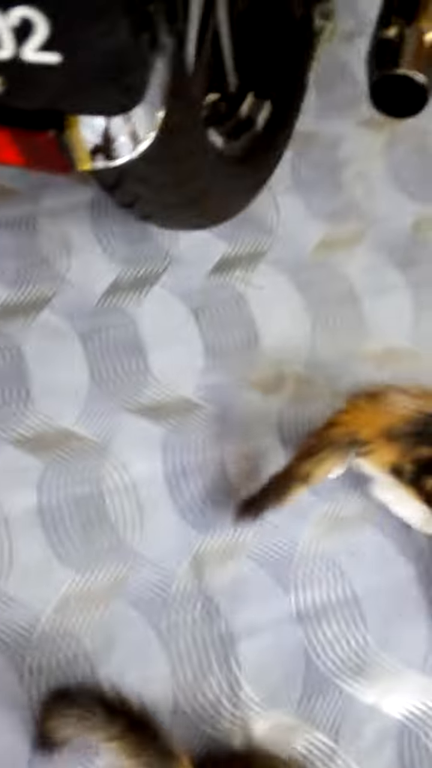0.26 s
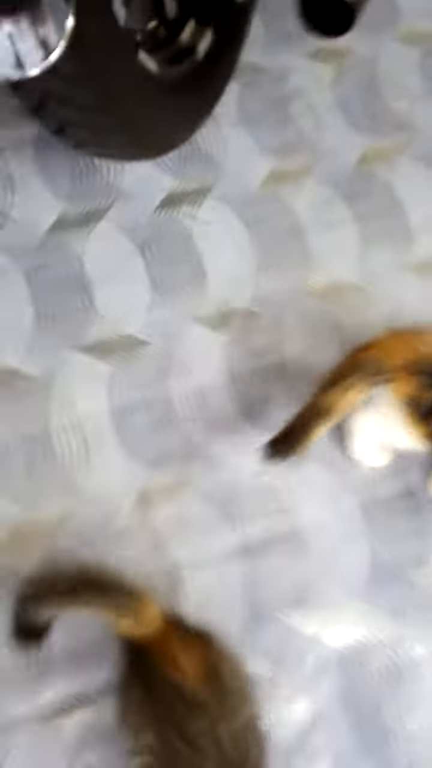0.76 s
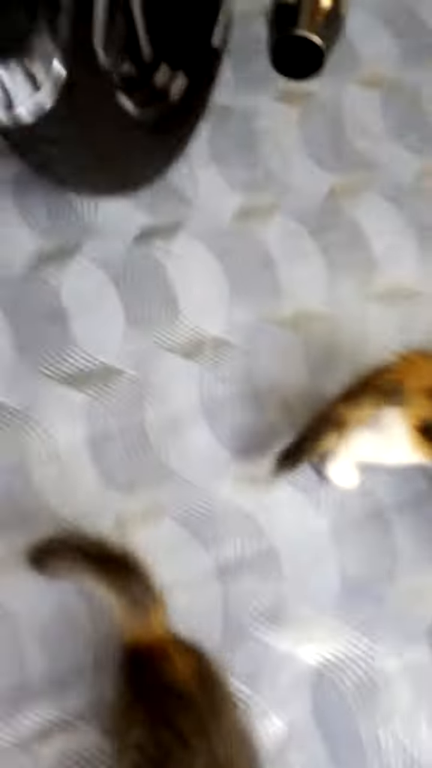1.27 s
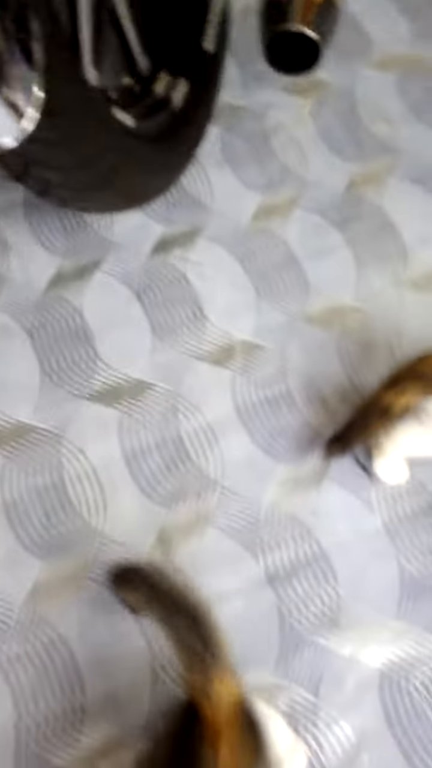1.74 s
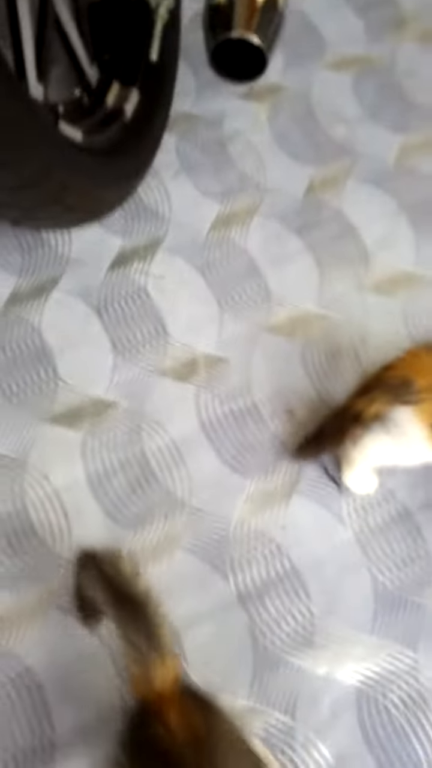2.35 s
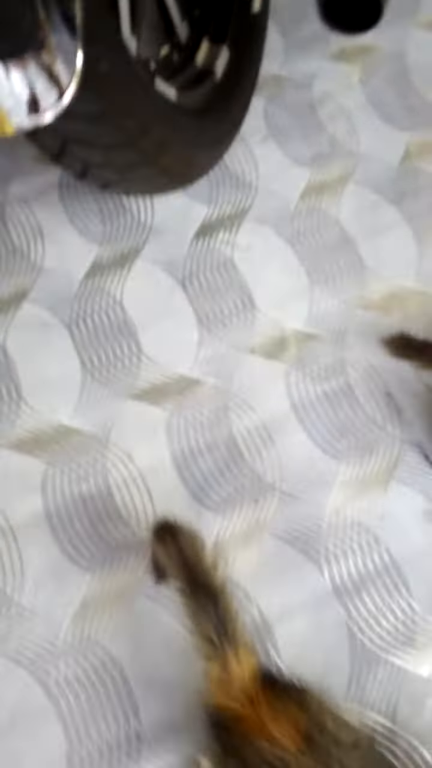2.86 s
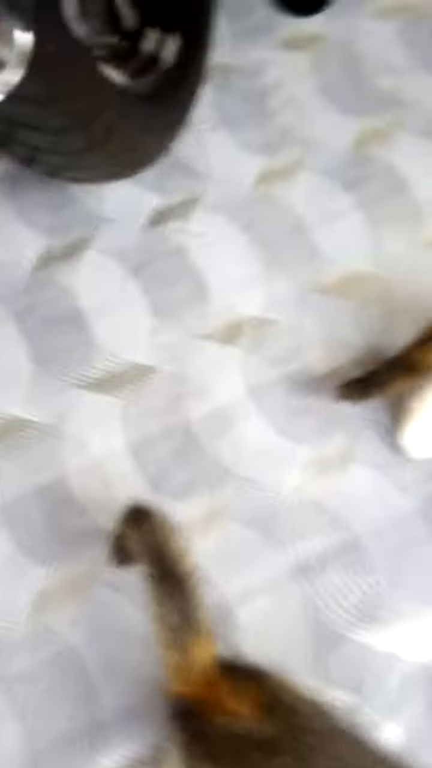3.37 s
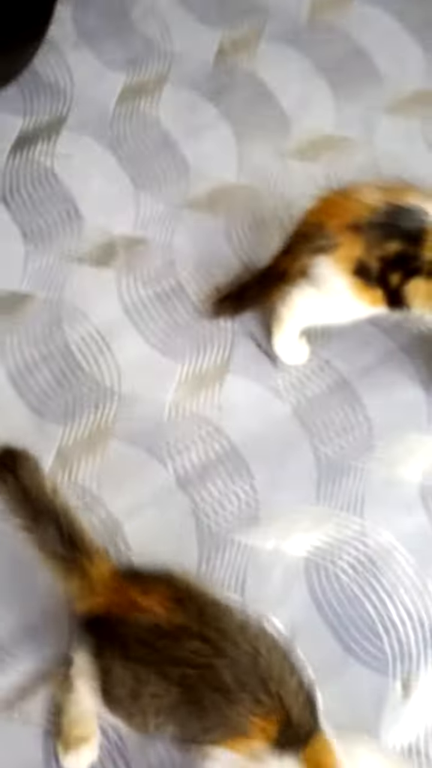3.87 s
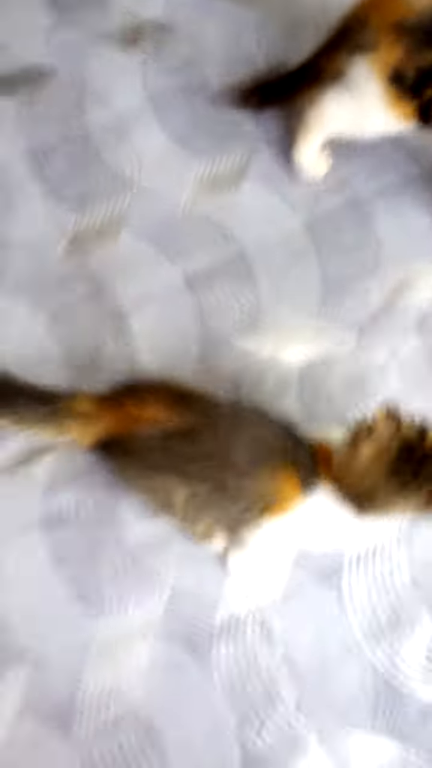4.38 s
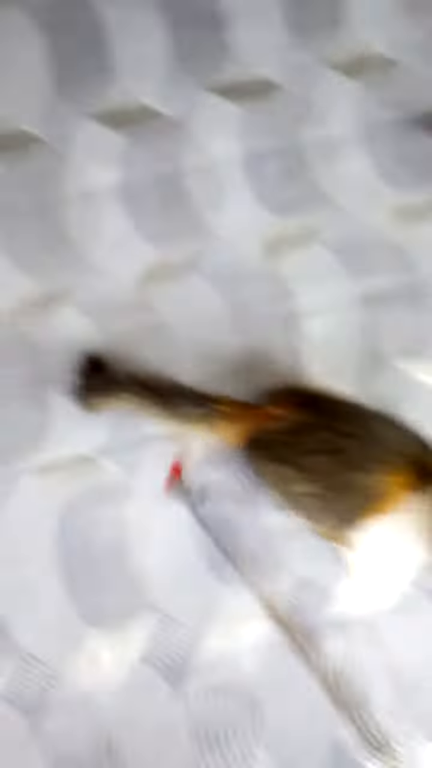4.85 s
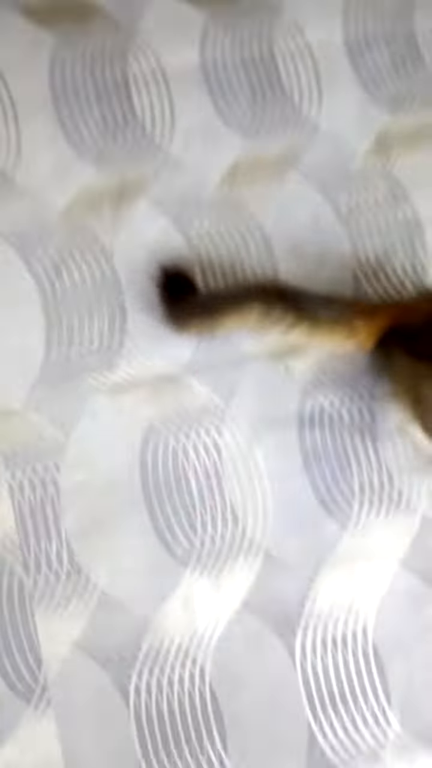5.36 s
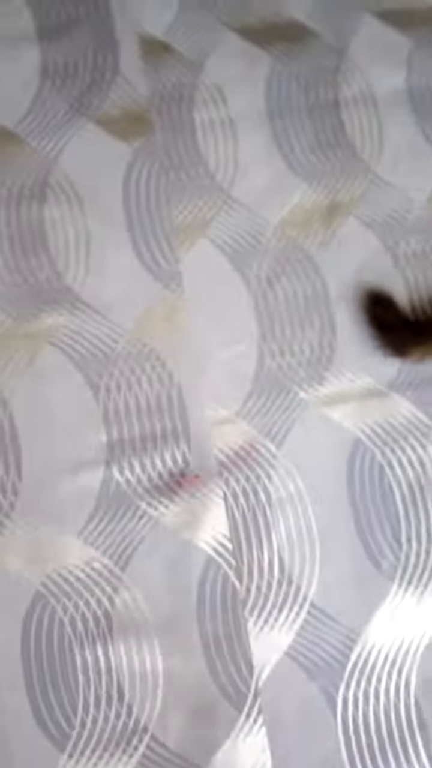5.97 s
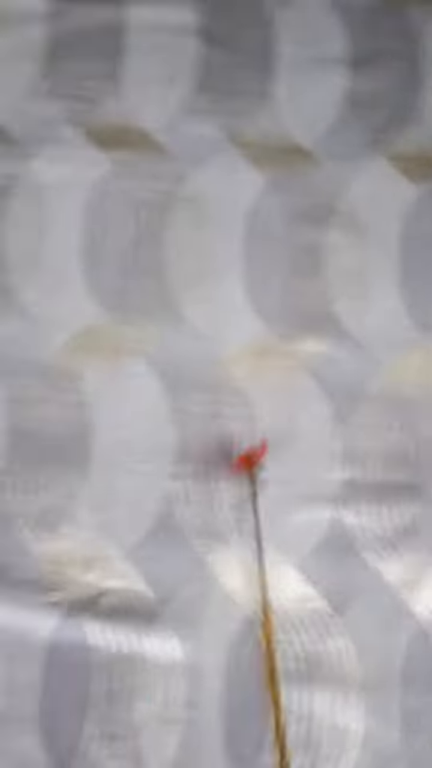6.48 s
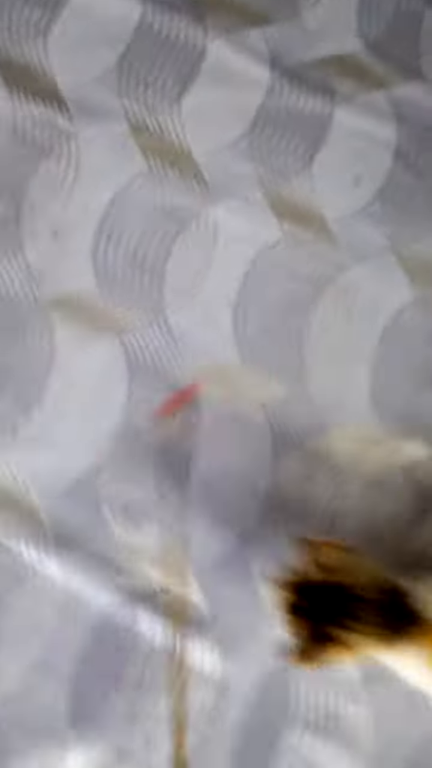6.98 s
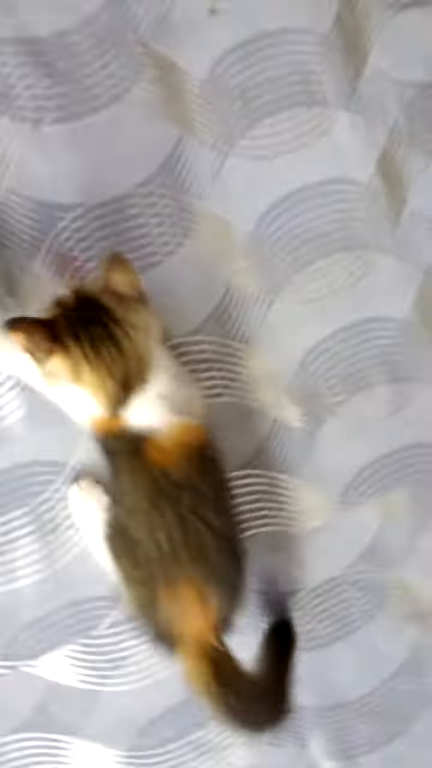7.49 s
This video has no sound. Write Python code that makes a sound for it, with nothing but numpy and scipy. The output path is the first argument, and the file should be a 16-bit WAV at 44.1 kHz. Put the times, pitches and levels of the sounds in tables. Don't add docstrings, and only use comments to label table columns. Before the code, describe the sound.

A close phone microphone in a small hard room picks up kittens on a thin plastic sheet, over low hiss and a very faint distant engine idle. From 0 to 1.8 s, dry bright crackles come in short uneven clusters, with hard single snaps near 1.2 and 1.5 s. Crinkling continues to about 2 s, then thins; a small hard toy knocks at 2.5 s with a weaker rebound. From 3.3 to 3.8 s wrestling makes dense crackling and sliding rustle, with a tiny metal bell jingling until about 4.2 s. A lull follows: faint claw ticks, a soft bump, and a more distant bell at 4.6 s. At 5.2 s crackling returns, loudest and sharpest from 5.4 to 6.5 s, with muffled paw thuds. After a gap, lower snaps and drumming sheet landings come at 7.1-7.6 s, then settle.

```python
import sys
import numpy as np
from scipy import signal
from scipy.fft import rfft, irfft
from scipy.io import wavfile
from scipy.ndimage import uniform_filter1d

SR = 44100
rng = np.random.default_rng(int(sys.argv[2]) if len(sys.argv) > 2 else 0)


def nominal_scale(level):
    x = np.asarray(level, float) / 20
    return 10 ** x


def output_pcm(signal):
    pcm = np.clip(np.atleast_2d(signal).T, -1, 1) * 32767
    wavfile.write(sys.argv[1], SR, np.round(pcm).astype(np.int16))


N = 340893

# t/s, duration/ms, level/dB,
# loudest f/Hz, spread/octaves
BUCKLING_CREASES = [(0.0012, 3.6, -50, 3850, 0.79), (0.0117, 4, -42.5, 3460, 0.99),
                    (0.2265, 2, -37.5, 4080, 0.37), (0.2272, 2.7, -32, 2890, 0.26),
                    (0.2731, 3.4, -37.5, 3540, 0.71), (0.2829, 5, -36, 3700, 0.54),
                    (0.2914, 4.3, -31.5, 2880, 0.57), (0.3148, 6.4, -28.5, 4700, 0.72),
                    (0.3219, 3.4, -32, 4900, 0.37), (0.3274, 8.2, -27, 4580, 0.32),
                    (0.3371, 2.9, -26, 4470, 0.39), (0.3449, 3.8, -27, 4340, 0.37),
                    (0.3993, 2.3, -47, 3680, 0.4), (0.4356, 7.0, -48, 3700, 0.28),
                    (0.4489, 7.9, -50.5, 3530, 0.32), (0.599, 1.4, -31.5, 3400, 0.64),
                    (0.6038, 5, -30.5, 2340, 0.17), (0.6091, 3.8, -29, 3260, 0.47),
                    (0.9522, 2.1, -48.5, 3530, 0.12), (0.9596, 1.2, -43, 3650, 0.16),
                    (1.181, 6, -63, 4040, 0.5), (1.1973, 1.07, -17.5, 4820, 0.3),
                    (1.3362, 3.9, -48, 2480, 0.073), (1.4636, 1.3, -18, 3850, 0.27),
                    (1.4917, 6.5, -35.5, 3470, 0.76), (1.5018, 10.5, -33.5, 2480, 0.4),
                    (1.5107, 3.7, -35.5, 2500, 0.29), (1.5284, 4.7, -25.5, 3780, 0.39),
                    (1.5412, 4.7, -27, 4900, 0.53), (1.5581, 1.2, -27, 3070, 0.27),
                    (1.6038, 2.7, -37.5, 3140, 0.19), (1.6234, 4.1, -38, 3530, 0.36),
                    (1.6388, 4.1, -28, 3130, 0.38), (1.6527, 3.5, -31.5, 4140, 0.61),
                    (1.7246, 2, -39, 3500, 0.42), (1.7801, 4.6, -55, 5000, 0.24),
                    (1.808, 1.3, -39.5, 3550, 0.075), (1.8137, 4.6, -39.5, 3520, 0.13),
                   (1.832, 5.7, -34, 5100, 0.29), (1.8452, 1.6, -28, 3600, 0.29),
                   (1.863, 1.6, -27, 3360, 0.46), (1.881, 1.7, -34.5, 3570, 0.35),
                   (1.9107, 1.4, -38, 3260, 0.36), (1.9161, 5.8, -46, 3470, 0.33),
                   (1.924, 2.6, -37, 3600, 0.17), (1.928, 6.3, -38, 3300, 0.3),
                   (1.938, 7.4, -36, 3730, 0.29), (1.949, 7.6, -37.5, 3370, 0.28),
                   (1.9618, 11.4, -33.5, 3530, 0.42), (1.9733, 6.5, -32, 3870, 0.63),
                   (2.4572, 3.7, -30, 2940, 0.06), (2.572, 11.2, -51.5, 2860, 0.1),
                   (3.2595, 7.6, -42.5, 1770, 0.31), (3.3053, 2.9, -29, 4930, 0.43),
                   (3.318, 5.7, -36, 5070, 0.71), (3.322, 3.1, -43, 3680, 0.68),
                   (3.3276, 3.7, -33.5, 5500, 0.22), (3.335, 2.1, -35.5, 4070, 0.7),
                   (3.378, 18, -47, 2310, 0.31), (3.3975, 3.2, -29, 2360, 0.32),
                   (3.412, 3.8, -28, 2470, 0.31), (3.4252, 11.6, -28, 4180, 0.67),
                   (3.4454, 2.2, -36, 3930, 0.48), (3.4551, 5.4, -30.5, 3470, 0.44),
                   (3.4996, 6.4, -48, 3500, 0.48), (3.5144, 3.5, -47, 5000, 0.47),
                   (3.522, 1.3, -35, 5100, 0.27), (3.529, 4.1, -39, 5000, 0.42),
                   (3.531, 16, -44.5, 2940, 0.24), (3.5508, 8, -37, 3620, 0.48),
                   (3.564, 2.1, -35, 2700, 0.21), (3.5686, 8, -31.5, 2765, 0.21),
                    (3.583, 12, -36.5, 3570, 0.46), (3.5969, 3.7, -28, 3200, 0.23), (3.602, 4, -29, 3670, 0.29),
                (3.6069, 4.7, -32.5, 3650, 0.47), (3.6163, 2.9, -30, 3140, 0.23),
                (3.6186, 9.1, -30, 3520, 0.29), (3.6298, 4.3, -30, 3340, 0.34),
                (3.6389, 1.3, -31, 3260, 0.23), (3.6615, 3.3, -30, 4700, 0.32),
                (3.6706, 3.6, -27.5, 5020, 0.32), (3.684, 7.2, -41.5, 3450, 0.59),
                (3.6957, 2.9, -34, 3550, 0.49), (3.7013, 3.3, -27, 3730, 0.26),
                (3.7104, 5.2, -34, 3700, 0.56), (3.7164, 7.1, -35, 3550, 0.75),
                (3.7271, 2.9, -28, 3560, 0.71), (3.734, 2.1, -22, 5040, 0.27), (3.747, 14, -32, 4900, 0.8),
                (3.767, 7.4, -32, 2490, 0.28), (3.778, 1.3, -30, 2420, 0.17),
                (3.7851, 3.4, -29, 2480, 0.39), (3.838, 3.4, -50, 4360, 0.57), (3.848, 16, -60, 4670, 0.61),
                (3.866, 4.3, -48, 5550, 0.4), (3.8717, 7.2, -45.5, 5640, 0.34),
                (3.8877, 4.3, -54, 5480, 0.3), (3.9, 3.4, -62, 5480, 0.23), (3.908, 3.5, -60, 5400, 0.23),
                (3.917, 5.1, -67, 5480, 0.24), (3.9544, 3.3, -58, 5560, 0.19),
                (3.962, 3.2, -53, 3450, 0.06), (5.2226, 1.4, -26, 2480, 0.3),
                (5.229, 3.7, -26.5, 4900, 0.6), (5.233, 2.6, -25, 5330, 0.25),
                (5.4078, 0.77, -20, 5000, 0.66), (5.4104, 3.5, -25.5, 3540, 0.86),
                    (5.4209, 3.8, -25, 2420, 0.35), (5.4467, 3.4, -26, 2970, 0.62),
                 (5.451, 4.7, -24, 5100, 0.73), (5.502, 11, -40.5, 2510, 0.69),
                 (5.527, 3.1, -23.5, 2550, 0.54), (5.589, 0.92, -17, 4080, 0.71),
                 (5.607, 5.1, -27, 3800, 0.31), (5.614, 5.2, -26, 4070, 0.57),
                 (5.6247, 5.7, -29, 2700, 0.64), (5.6615, 2.9, -34.5, 2320, 0.38),
                 (5.72, 8.9, -46.5, 2470, 0.54), (5.7321, 12, -51, 2950, 0.94),
                 (5.779, 3.6, -30.5, 2600, 0.29), (5.7818, 9, -30, 3000, 0.62),
                 (5.7933, 3.9, -22.5, 2356, 0.23), (5.8393, 3.7, -45, 2950, 0.77),
                 (5.8417, 6.3, -37.5, 2460, 0.9), (5.8496, 1.1, -31, 2220, 0.14),
                 (5.9548, 1.12, -15.5, 4000, 0.88), (5.9604, 11, -32.5, 2180, 0.65),
                 (6.0442, 1.07, -27, 2850, 1.1), (6.0475, 16.7, -31.5, 1770, 0.43),
                 (6.106, 7.7, -47, 3150, 0.99), (6.1257, 1.7, -29.5, 2180, 0.52),
                 (6.1482, 1.14, -23, 2050, 0.24), (6.1512, 4.6, -26.5, 2700, 0.18),
                 (6.1574, 5, -25.5, 3630, 0.34), (6.1717, 12, -52, 3700, 0.42),
                 (6.2734, 2.3, -48, 5100, 0.41), (6.282, 1.8, -52, 5100, 0.39),
                 (6.3053, 2.56, -25.5, 3270, 0.79), (6.3102, 3.1, -29.5, 2650, 0.5),
                 (6.3357, 2.2, -33, 4500, 0.56), (6.338, 10, -31.5, 3150, 0.65),
                 (6.357, 5.1, -33.5, 2860, 0.8), (6.3786, 11, -39, 2230, 0.38),
                    (6.392, 2.1, -44, 3700, 0.47), (6.3973, 2.1, -36, 3160, 1.1),
                  (6.4446, 2.3, -50.2, 4260, 0.52), (6.4503, 3.5, -56, 3900, 0.66),
                  (6.4633, 1.5, -24.5, 2640, 0.63), (6.4771, 0.58, -20, 2860, 0.5),
                  (6.4878, 2, -28, 3230, 0.92), (6.491, 4.8, -32, 3360, 0.71),
                  (6.5006, 3, -31.5, 3250, 0.84), (6.5203, 4.2, -25.5, 2830, 1),
                  (6.5602, 2.4, -43, 2610, 0.44), (6.567, 8.5, -35, 2320, 0.98),
                  (6.717, 7.3, -55.5, 1585, 0.24), (7.0718, 1.7, -49.5, 2710, 0.18),
                  (7.0821, 1.5, -23.5, 2240, 0.46), (7.109, 2, -32, 2660, 0.76),
                  (7.1218, 2, -39, 2850, 0.69), (7.1287, 4.1, -40, 2660, 0.83),
                  (7.1404, 2.76, -26, 1680, 0.37), (7.1507, 4.9, -23, 1785, 0.26),
                  (7.2427, 7.6, -53.5, 1770, 0.23), (7.2582, 3.2, -63, 6440, 0.15),
                  (7.3, 1.34, -33, 1720, 0.37), (7.3136, 2, -26.5, 1850, 0.36),
                  (7.3366, 3.3, -36, 1650, 0.069), (7.3519, 6.3, -38, 1690, 0.26),
                  (7.3577, 4.5, -38, 1800, 0.56), (7.4183, 5.9, -59, 2690, 0.59),
                  (7.4346, 5.8, -35, 2530, 0.16), (7.451, 2.8, -35, 3300, 1), (7.516, 1.5, -39, 2250, 0.58),
                  (7.523, 10.3, -27.5, 1736, 0.28), (7.614, 1.2, -45, 2520, 0.52),
                  (7.6265, 1.9, -42.5, 3500, 0.88), (7.644, 8.1, -34, 2320, 0.33),
                  (7.6982, 5, -46.5, 3800, 0.94)]
SECOND_CREASES = [(0.6011, 7.1, -36.5, 5480, 0.28), (1.2, 1.3, -24.5, 3600, 0.18),
                  (1.2007, 3.2, -29.5, 5100, 0.31), (1.8636, 2.9, -32, 2080, 0.16),
                  (2.4571, 3.7, -32.5, 5020, 0.055), (3.325, 9.2, -42.5, 2340, 0.18),
                  (3.425, 17, -32.5, 5300, 0.26), (3.962, 3.8, -40.5, 2620, 0.065),
                  (3.962, 3.3, -40, 4750, 0.08), (4.317, 1.9, -64, 2380, 0.17),
                  (4.369, 1.8, -67, 2350, 0.16), (5.484, 7, -44.5, 4900, 0.46),
                  (5.5274, 1.8, -29, 5800, 0.48), (5.53, 2.4, -32, 1820, 0.22),
                  (5.9684, 3.2, -33, 4570, 0.69), (6.142, 3.7, -33.5, 2000, 0.33),
                  (6.1584, 4, -27, 5800, 0.36), (6.521, 4, -31.5, 1730, 0.11),
                  (6.392, 8.1, -37.5, 5320, 0.15), (4.399, 3.2, -64, 2470, 0.15),
                  (6.781, 1.5, -58, 2300, 0.36), (7.434, 5.8, -37.5, 4700, 0.16)]
# t/s, duration/ms, level/dB
CLAW_TICKS = [(0.9083, 1.5, -55), (2.439, 1.2, -48.5), (4.106, 2.2, -53), (4.131, 0.5, -47),
              (4.262, 1, -59), (4.276, 1.1, -56), (4.294, 1.7, -47.5), (4.3519, 1.4, -59),
              (4.38, 1.9, -55.5), (4.422, 6.6, -52), (4.433, 5.8, -52), (4.45, 0.58, -48),
              (4.4666, 0.77, -38.5), (4.516, 1.1, -51.5), (4.599, 3.9, -58.5), (4.6272, 2.2, -56),
              (4.664, 1.1, -50), (4.821, 0.46, -46.5), (4.884, 3.6, -59.5), (6.821, 6.5, -56)]
# t/s of the peak, rise/s, fall/s, level/dB, brightness f/Hz
SLIDES = [
    (0, 0.011, 0.074, -40, 4480),
    (0.992, 0.037, 0.34, -64.5, 4350),
    (3.5, 0.18, 0.32, -46, 4400),
    (3.649, 0.067, 0.21, -48, 4580),
    (4.928, 0.08, 0.41, -69, 5030),
    (5.771, 0.032, 0.14, -40, 3520),
    (6.142, 0.026, 0.2, -51.5, 3600),
    (7, 0.054, 0.018, -61.5, 4000),
    (7.131, 0.045, 0.066, -41.5, 4200),
    (7.502, 0.088, 0.41, -57, 5430),
]
# f/Hz, level/dB
MIC_RESPONSE = [(700, -11.5), (1100, -6), (1500, -2), (5500, 2.5), (6500, -4), (7500, -23), (9000, -37.5),
                (13500, -47), (15200, -46), (16000, -72.5)]
# f/Hz, T60/s
ROOM_DECAY = [(1000, 0.35), (2500, 0.2), (5000, 0.25), (7000, 0.22), (12000, 0.19)]
# multiple of the idle rate, level/dB
ENGINE_ORDERS = [(4, -77), (5, -76), (6, -77), (7, -70), (8, -72.5), (9, -78.5), (10, -75), (20, -83.5)]
# f/Hz, level/dB per Hz
HISS_SPECTRUM = [(20, -16.5), (44, -22.5), (54, -7.5), (103, -1), (138, -14.5), (160, -10.5), (285, -14.5),
                 (610, -20.5), (1020, -21.5), (1840, -29), (5300, -34), (6500, -37), (8200, -49),
                 (13600, -48.5), (15300, -38.5), (15900, -67)]
# t/s, peak level/dB
CRACK_TIMES = [(1.1987, -47.5), (3.424, -53.5), (3.6531, -61), (3.8612, -50), (5.406, -38.5),
               (5.4525, -45.5), (5.589, -56), (5.953, -45.5), (6.52, -64), (7.313, -58), (7.624, -57)]
# t/s, peak level/dB
TOY_KNOCKS = [
    (2.457, -43),
    (2.568, -51.5),
]
# f/Hz, blur/Hz, level/dB, T60/s
TOY_MODES = [(2860, 147, 0.5, 0.2), (3620, 50, -10, 0.3), (4410, 57, -5.5, 0.15), (6310, 80, -7.5, 0.1),
             (2330, 390, 4.5, 0.12), (5000, 270, 4.5, 0.077)]
# t/s, f/Hz, level/dB, duration/s
PAW_THUDS = [
    (2.644, 57.8, -45, 0.13),
    (4.296, 100.7, -43, 0.094),
    (5.742, 66, -43.5, 0.22),
    (5.915, 55.5, -45, 0.15),
    (6.043, 601, -44.5, 0.067),
    (6.978, 89.5, -44.5, 0.17),
    (7.286, 808, -51, 0.075),
    (7.638, 257, -49, 0.22),
    (4.614, 2014, -56.5, 0.22),
]
# t/s, peak level/dB
BELL_STROKES = [(3.3789, -54.5), (3.4241, -57.5), (3.4391, -63), (3.4622, -57), (3.488, -62),
                (3.5137, -58.5), (3.6063, -52), (3.649, -50), (3.71, -53), (3.787, -52), (3.8389, -54),
                (3.8864, -54.5), (3.95, -57.5), (3.9664, -55.5), (3.985, -55.5), (4.008, -63), (4.04, -66),
                (4.111, -79.5), (4.188, -68), (4.215, -70.5)]
# f/Hz, blur/Hz, level/dB, T60/s
BELL_MODES = [(8250, 120, -5, 0.29), (5500, 360, 9, 0.36), (8700, 1200, -13.5, 0.2), (6320, 390, 2.5, 0.24),
              (4700, 630, 1.5, 0.098)]
# t/s, peak level/dB
SHAKE_STROKE = [(3.655, -71.5)]
# f/Hz, blur/Hz, level/dB, T60/s
SHAKE_MODE = [(15000, 800, 0.94, 0.3)]
# t/s, peak level/dB
FAR_STROKES = [
    (4.6, -66.5),
    (4.66, -56.5),
]
# f/Hz, blur/Hz, level/dB, T60/s
FAR_MODES = [(5160, 940, -2, 1), (5360, 110, -1.5, 0.5), (5020, 110, -3.5, 0.45)]
# t/s, peak level/dB
SHEET_LANDINGS = [
    (7.152, -48),
    (7.314, -39),
    (7.358, -52),
    (7.526, -37),
]
# f/Hz, blur/Hz, level/dB, T60/s
SLACK_MODE = [(1770, 600, -8, 0.21)]


def evened(x):
    return x / np.sqrt(np.mean(x ** 2) + 1e-20)


def read(points, hz):
    f, value = np.transpose(points)
    return np.interp(np.log(hz + 1), np.log(f + 1), value)


def add(mix, s, sound):
    part = mix[max(round(s * SR), 0):][:len(sound)]
    part += sound[:len(part)]


def causal(db):
    cepstrum = irfft(np.log(nominal_scale(db)))
    half = cepstrum.shape[-1] // 2
    cepstrum[..., 1:half] *= 2
    cepstrum[..., half + 1:] = 0
    return np.exp(rfft(cepstrum))


def drift(per_s):
    knot_rate = 200
    knots = rng.standard_normal(int(N / SR * knot_rate) + 2)
    span = int(knot_rate / per_s)
    smooth = evened(uniform_filter1d(uniform_filter1d(knots, span), span))
    return np.interp(np.arange(N) * knot_rate / SR, np.arange(len(knots)), smooth)


def blurred(hz, blur_hz, count):
    pole = np.exp(-np.pi * blur_hz / SR)
    noise = rng.standard_normal((2, count + 2000))
    wander = signal.lfilter([1], np.poly([pole, pole]), noise)[:, 2000:]
    turn = 2 * np.pi * hz * np.arange(count) / SR
    return evened(wander[0] * np.cos(turn) + wander[1] * np.sin(turn))


def creases():
    ticks = [(*tick, 4900, 0.21) for tick in CLAW_TICKS]
    return np.vstack([BUCKLING_CREASES,
                      ticks, SECOND_CREASES])


def crease_clicks(ms, t, luck, sizes, air):
    snap = (t == 0) & (ms < 3)
    click_db = np.where(snap, 11, 4.5 * sizes)
    clicks = ((luck > 1.4) | snap) * np.sign(air) * nominal_scale(click_db) + 0.58 * 0.24 * air
    rise = np.clip(t / (0.0013 + 0.39 * ms / 1000) + 1.04, 0, 1)
    creep = nominal_scale(-23.0) * np.exp(np.minimum(t, 0) / 0.012) * (t > 0.95 * t[0]) * (ms > 1.5)
    fall = np.clip((ms / 1000 - t) / (0.00098 + 0.35 * ms / 1000) + 0.5, 0, 1)
    return clicks * np.maximum(rise, creep) * fall


def crease_band(f, hz, octaves, luck):
    width = np.maximum(1.38 * abs(octaves) ** 2.3, 0.065)
    taut = 1 + 1.7 * np.clip(0.35 - octaves, 0, 1)
    rings_db = -8.5 * taut * np.log10(1 + (np.log2(f / hz) / width) ** 2)
    low_hz = np.maximum(hz * 2 ** (-1.58 * octaves), 1370)
    low_cut_db = np.minimum(54.0 * np.maximum(np.log2(low_hz / f), 0) ** 2, 45)
    mottle = evened(uniform_filter1d(uniform_filter1d(luck[:, :len(f)], size=18), size=18))
    return read(MIC_RESPONSE, f) + 2.8 * mottle - low_cut_db, rings_db


def sheet():
    size, lead = 2048, 384
    s, ms, db, hz, octaves = creases().T[:, :, None]
    t = (np.arange(size) - lead) / SR
    f = np.fft.rfftfreq(size, 1 / SR) + 1
    luck, sizes, air = rng.standard_normal((len(s), size, 3)).transpose(2, 0, 1)
    push = rfft(crease_clicks(ms, t, luck, sizes, air))
    push /= np.sqrt(uniform_filter1d(abs(push) ** 2, size=30) + 1e-12)
    shape_db, rings_db = crease_band(f, hz, octaves, luck)
    colours_db = np.array([shape_db + rings_db, shape_db + 0.71 * rings_db])
    bursts = irfft(push * causal(colours_db))
    bursts *= nominal_scale(db) * np.sqrt(ms / 1000 * SR / (bursts ** 2).sum(2, keepdims=True))
    out = np.zeros((2, N + lead))
    for mix, heard in zip(out, bursts):
        for at, burst in zip(s[:, 0] - 0.0003, heard):
            add(mix, at, burst)
    return out[:, lead:]


def rustle():
    out = np.zeros(N)
    f = np.arange(SR // 2 + 1) + 1.0
    for s, rise, fall, db, hz in SLIDES:
        t = np.arange(-round(2 * min(rise, s / 2) * SR), round(2 * fall * SR)) / SR
        sizes = nominal_scale(2.5 * np.minimum(rng.exponential(1, SR), 5))
        shower = sizes * (rng.random(SR) < 2500 / SR) * rng.choice([-1., 1.], SR)
        hump = np.exp(-0.5 * np.log2(f / hz) ** 2)
        band = nominal_scale(read(MIC_RESPONSE, f)) * (hump + 1.0)
        crinkle = evened(irfft(rfft(shower) * band))
        swell_db = db - 20 * np.maximum(-t / rise, t / fall)
        add(out, s + t[0], nominal_scale(swell_db) * crinkle[:len(t)])
    return out


def room(x):
    length, spacing = SR // 2, 12
    taps = np.zeros((3, length))
    slots = np.arange(120, length - spacing, spacing)
    at = slots + rng.integers(0, spacing, (3, len(slots)))
    np.put_along_axis(taps, at, rng.choice([-1., 1.], at.shape), 1)
    hz, t, z = signal.stft(taps, SR, nperseg=128)
    decay = nominal_scale(-60 * t / read(ROOM_DECAY, hz)[:, None])
    tails = signal.istft(z * decay, SR, nperseg=128)[1]
    turn = np.arange(N) / SR * 23 + np.arange(3)[:, None] / 3
    shares = np.sqrt(2 / 3) * np.cos(np.pi * turn)
    wet = signal.fftconvolve(x * shares, tails / np.linalg.norm(tails[0]), axes=1)
    return wet.sum(0)[:N]


def engine():
    idle_hz = 13.55
    turns = np.cumsum(idle_hz * (1 + 0.0074 * drift(1.855))) / SR
    out = np.zeros(N)
    for k, db in ENGINE_ORDERS:
        level = nominal_scale(db + 4.5 + 4.0 * drift(4.8))
        out += level * np.sin(2 * np.pi * (k * turns + k % 2 / 4))
    return out


def hiss():
    frames, hz = N // 512 + 5, np.fft.rfftfreq(2048, 1 / SR)
    a, b, patches = rng.standard_normal((frames, 1025, 3)).T
    patches = evened(uniform_filter1d(uniform_filter1d(patches, 16, 0), 6, 1))
    z = (a + 1j * b) * nominal_scale(read(HISS_SPECTRUM, hz)[:, None] + 2.26 * patches)
    noise = signal.istft(z, nperseg=2048, noverlap=1536)[1][:N]
    return nominal_scale(-55.5 - 7.0) * evened(noise)


def cracks():
    t, out = np.arange(1500) / SR, np.zeros(N)
    band = signal.butter(4, [7500, 16500], "bandpass", fs=SR, output="sos")
    soften = signal.butter(2, 9000, fs=SR, output="sos")
    high = np.vstack([band, soften])
    for s, db in CRACK_TIMES:
        envelope = nominal_scale(db + 1 - 60 * t / 0.018) * np.minimum(t / 0.00075, 1)
        add(out, s, envelope * signal.sosfilt(high, rng.standard_normal(len(t))))
    return out


def struck(strokes, modes):
    t, out = np.arange(SR // 2) / SR, np.zeros(N)
    for s, db in strokes:
        for hz, blur_hz, mode_db, t60 in modes:
            envelope = nominal_scale(db - 3.0 + mode_db - 60 * t / t60) * np.minimum(t / 0.002, 1)
            add(out, s, envelope * blurred(hz, blur_hz, len(t)))
    return out


def thuds():
    out = np.zeros(N)
    for s, hz, db, length in PAW_THUDS:
        u = np.arange(round(2 * length * SR)) / SR / length
        swell = 3 * u * np.exp(1 - 3 * u) * (2 - u) / 2
        add(out, s, nominal_scale(db - 10.5) * swell * blurred(hz, 0.25 * hz, len(u)))
    return out


def scene():
    direct, to_walls = sheet()
    near = rustle() + cracks() + struck(TOY_KNOCKS, TOY_MODES)
    near += struck(BELL_STROKES, BELL_MODES) + struck(SHAKE_STROKE, SHAKE_MODE)
    near += struck(FAR_STROKES, FAR_MODES) + struck(SHEET_LANDINGS, SLACK_MODE)
    reverberation = nominal_scale(-7.5) * room(to_walls + near)
    return (direct + near + reverberation + engine() + hiss() + thuds())[None]


def top_cut(x):
    return signal.sosfilt(signal.butter(12, 15655, fs=SR, output="sos"), x)


def record(dry):
    return top_cut(dry)


dry = scene()
out = record(dry)
output_pcm(out)
```